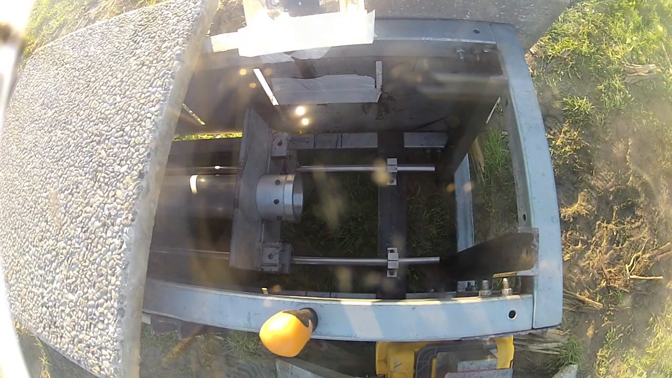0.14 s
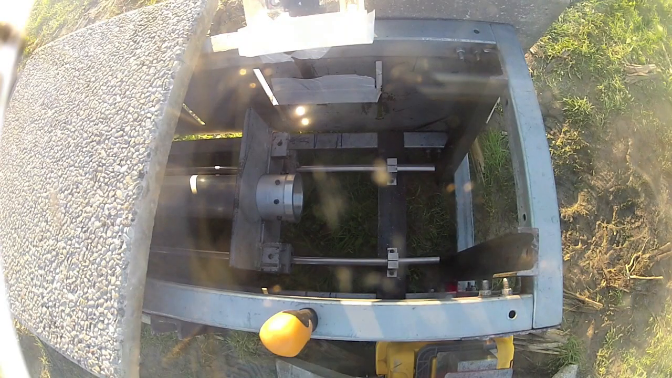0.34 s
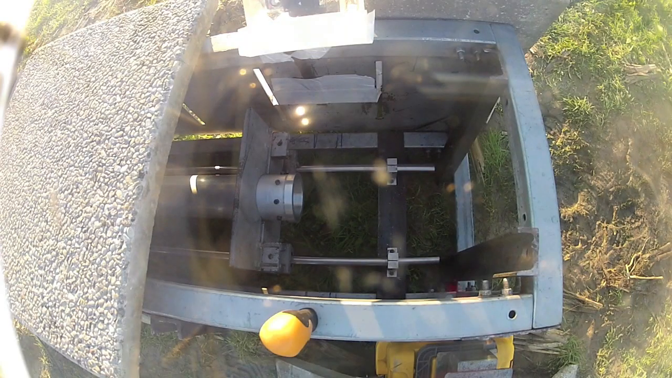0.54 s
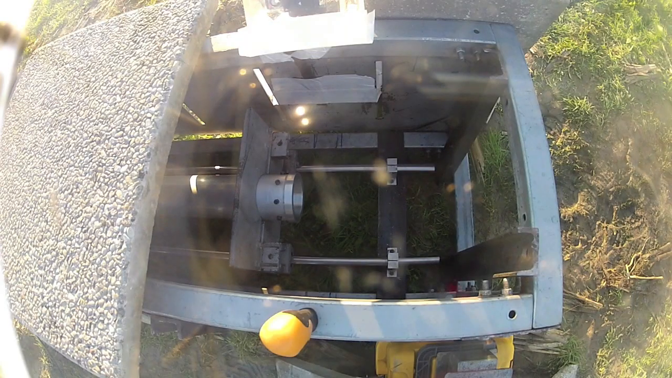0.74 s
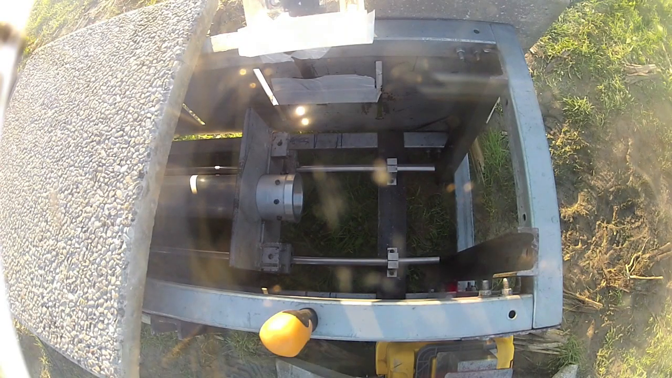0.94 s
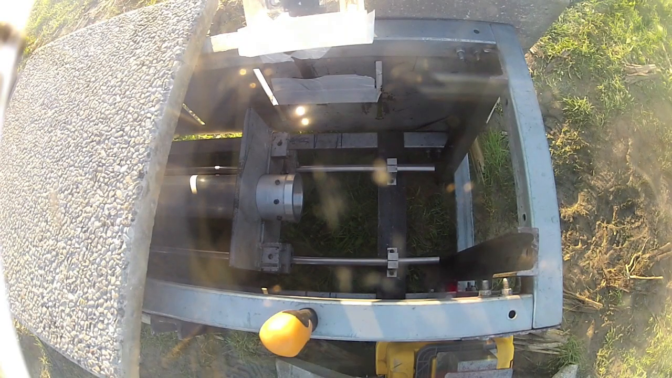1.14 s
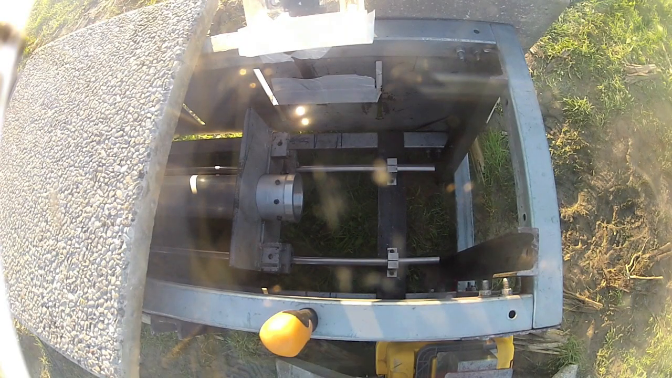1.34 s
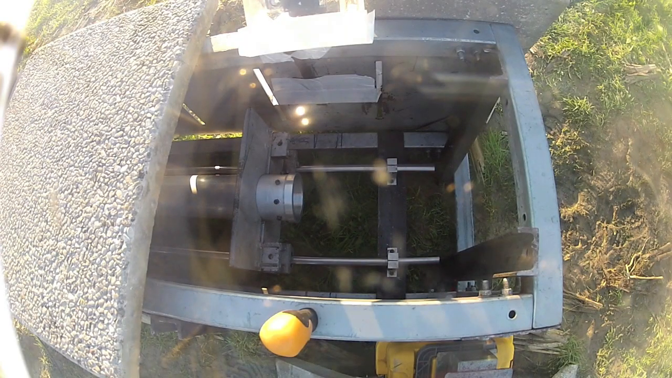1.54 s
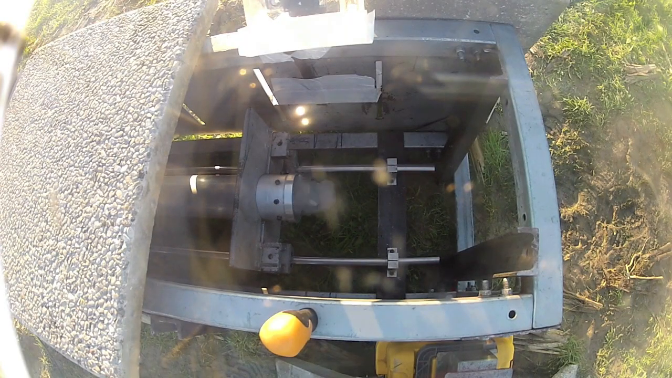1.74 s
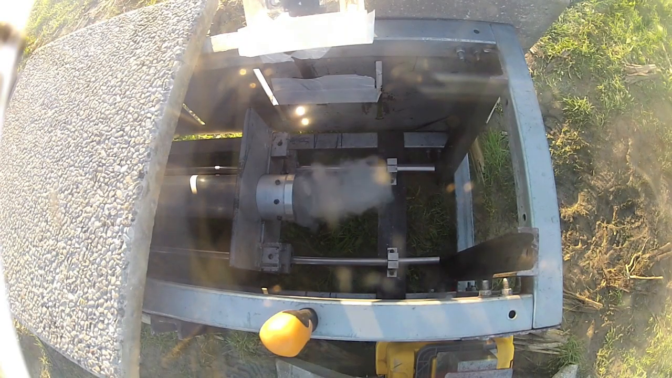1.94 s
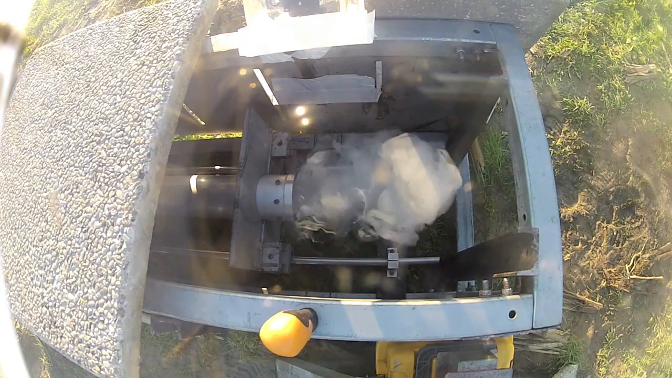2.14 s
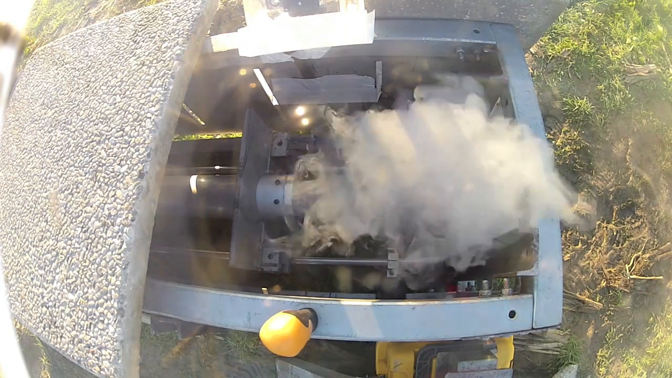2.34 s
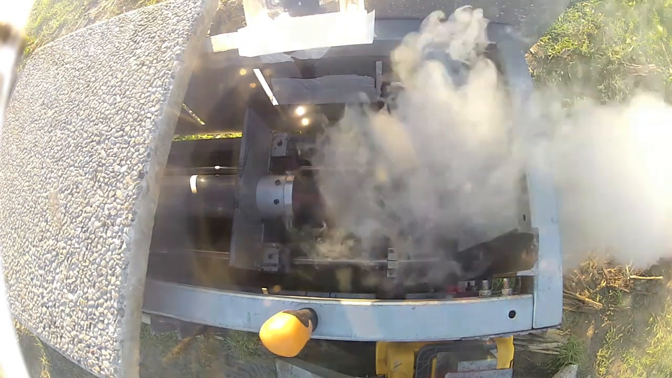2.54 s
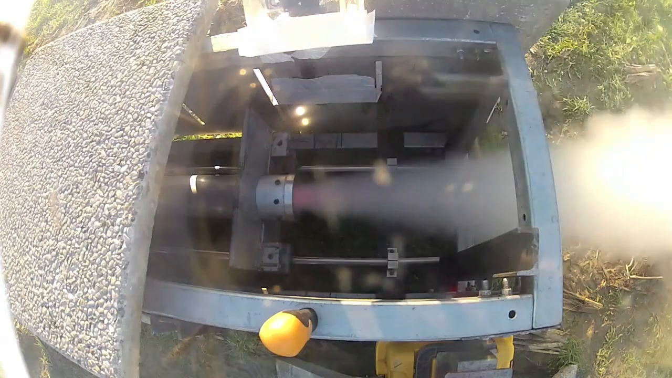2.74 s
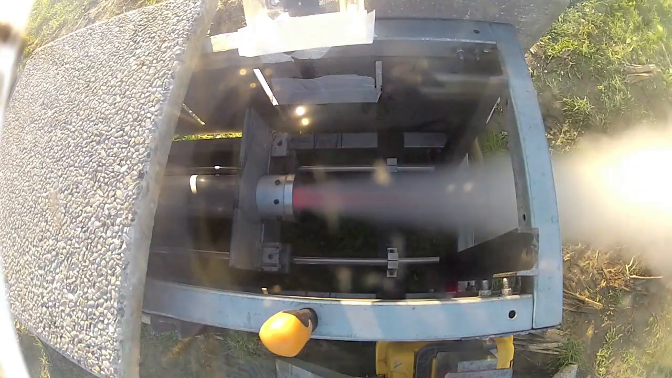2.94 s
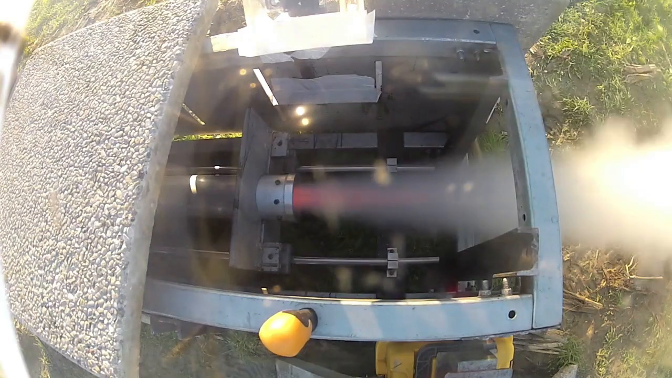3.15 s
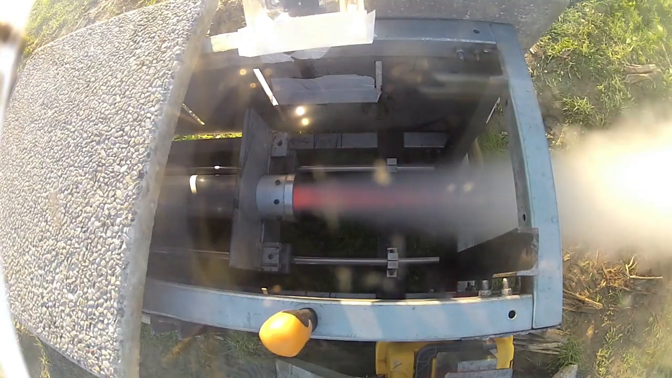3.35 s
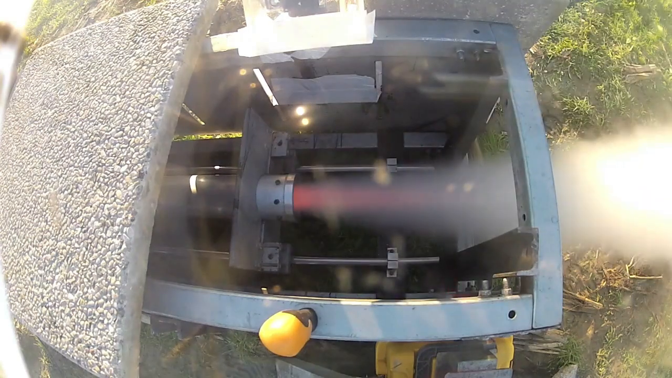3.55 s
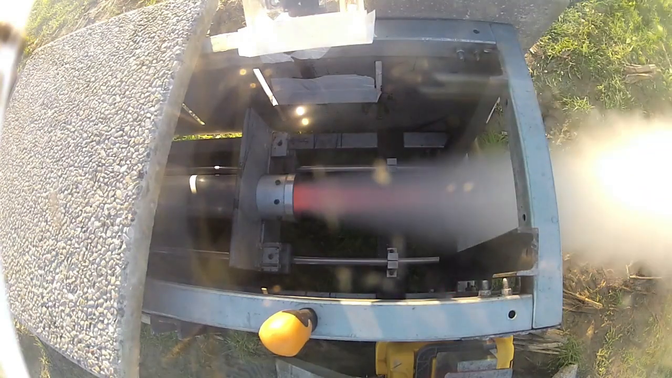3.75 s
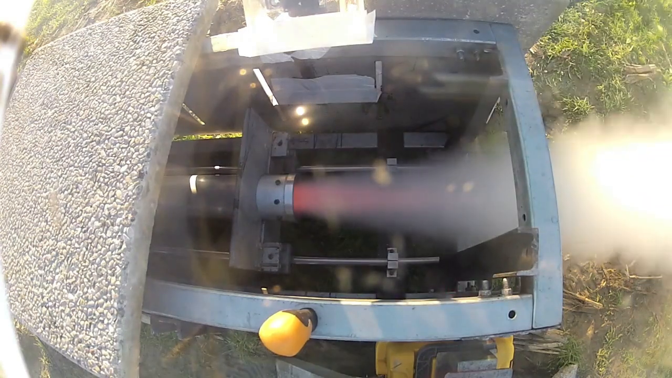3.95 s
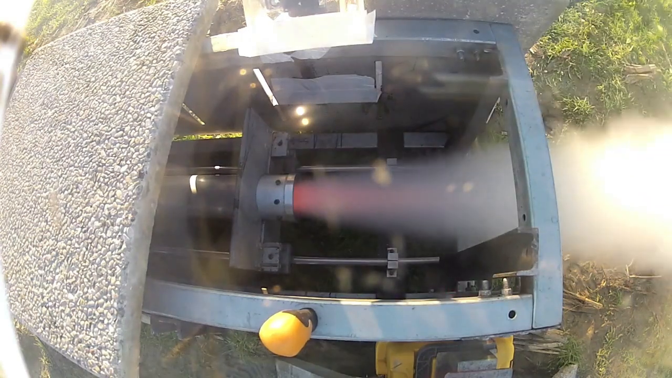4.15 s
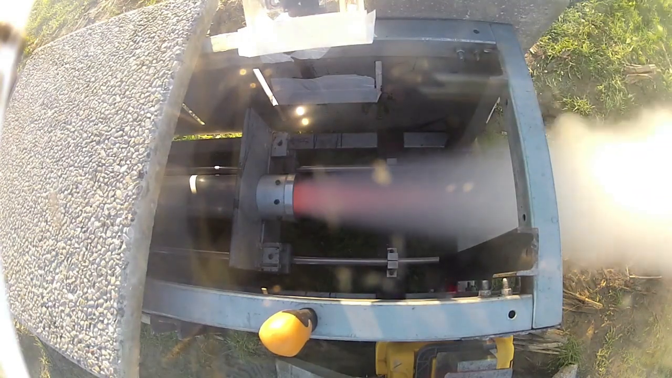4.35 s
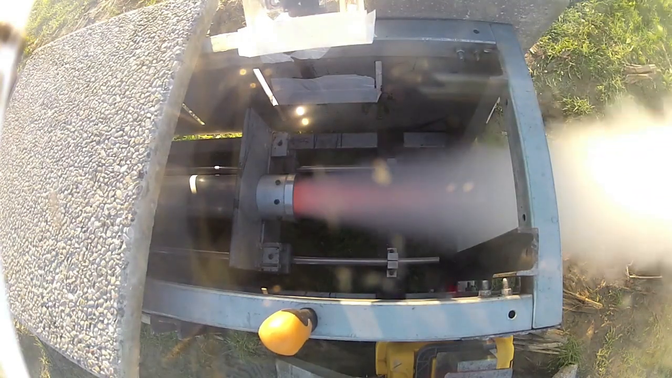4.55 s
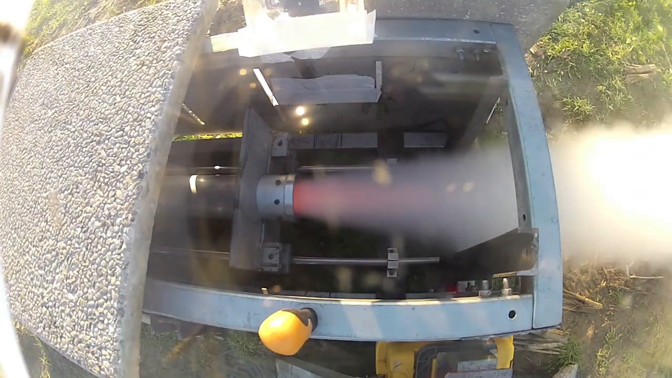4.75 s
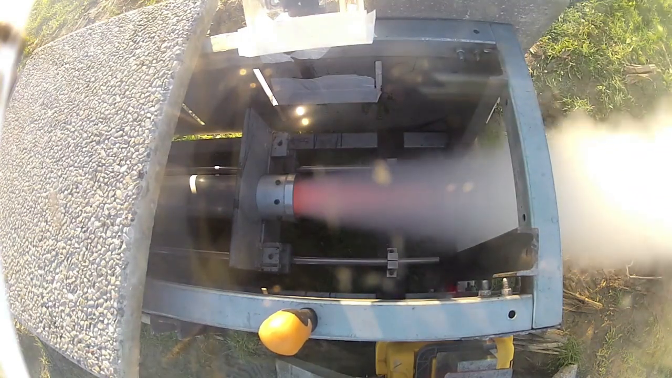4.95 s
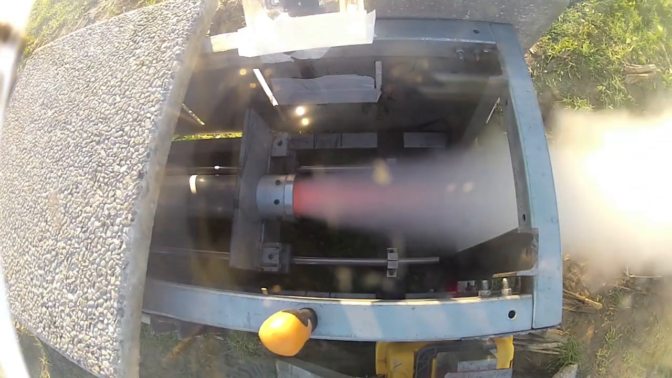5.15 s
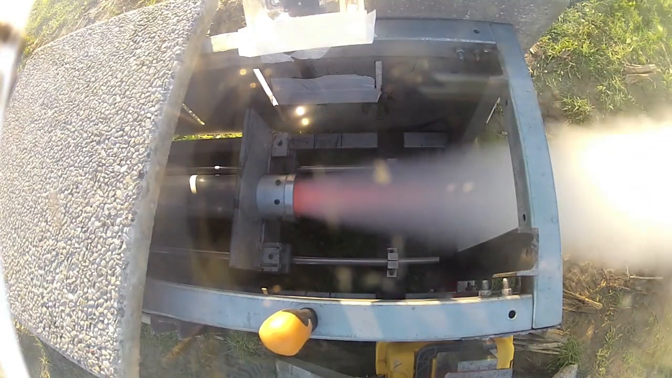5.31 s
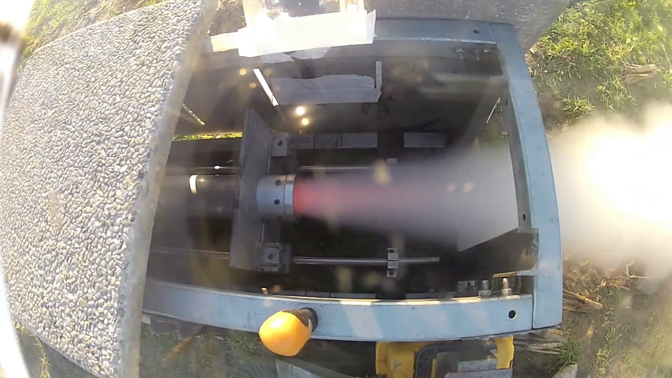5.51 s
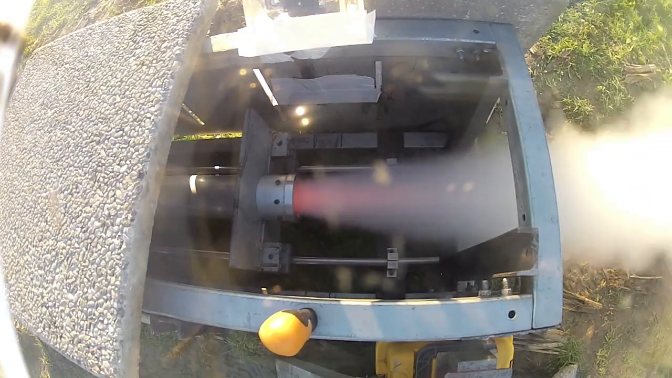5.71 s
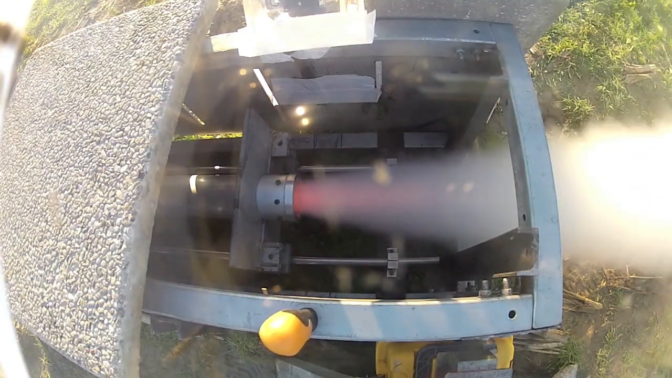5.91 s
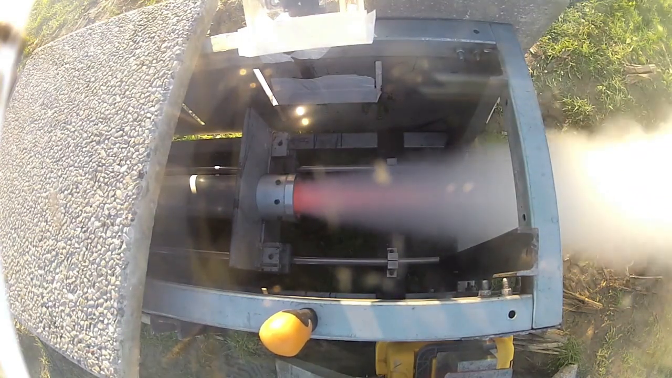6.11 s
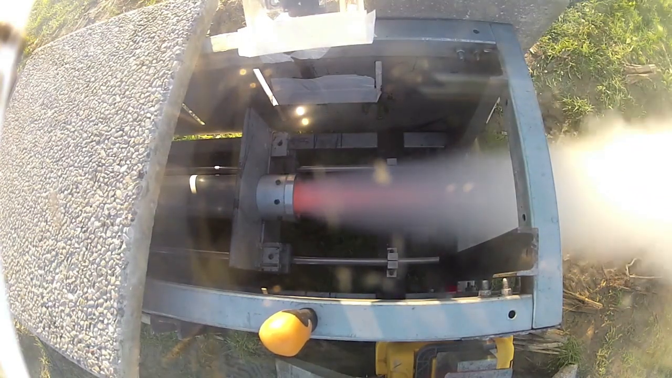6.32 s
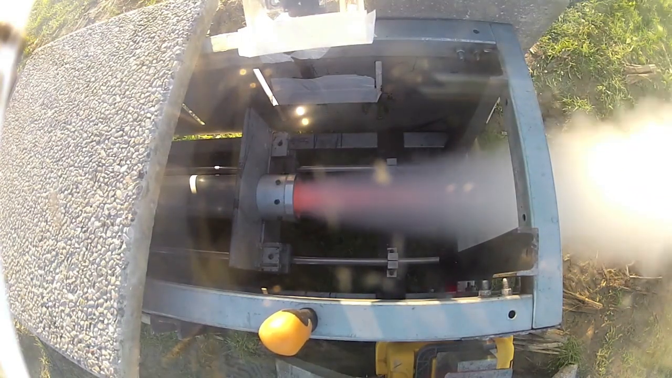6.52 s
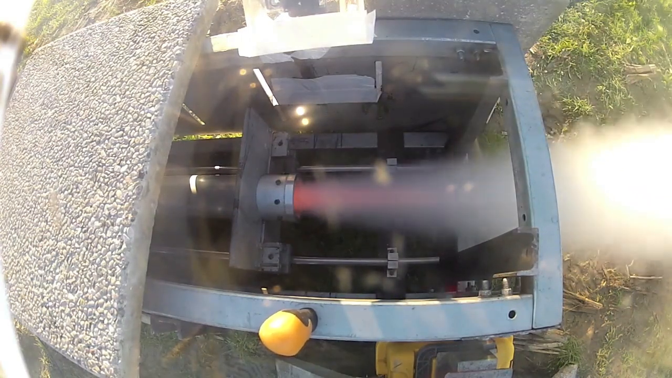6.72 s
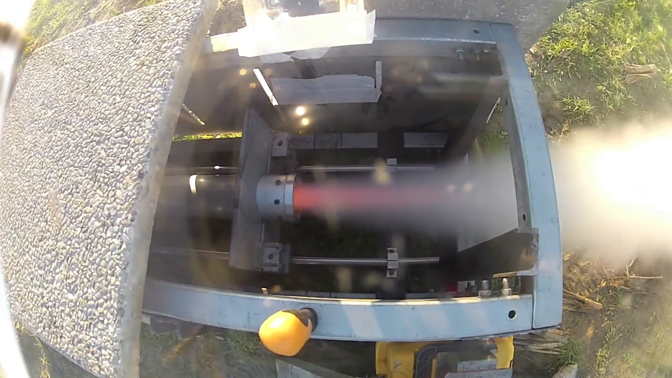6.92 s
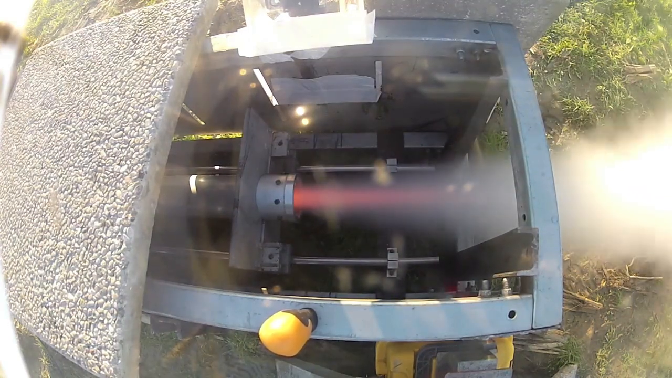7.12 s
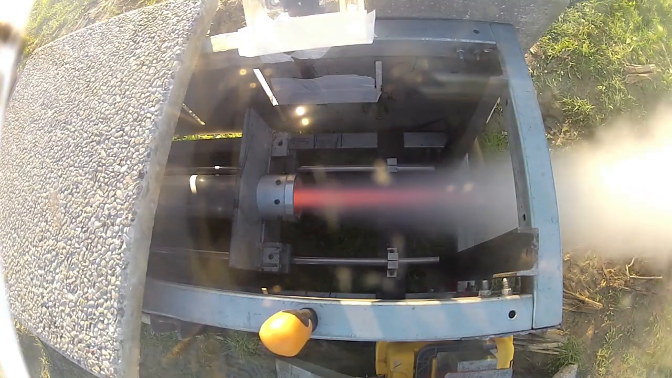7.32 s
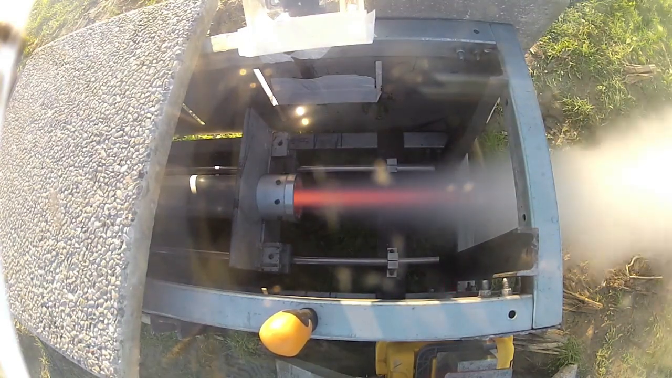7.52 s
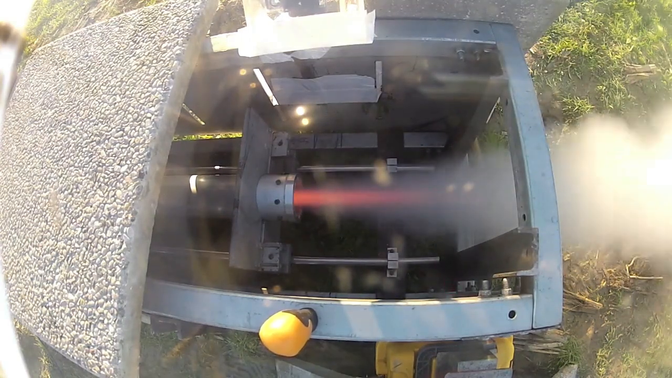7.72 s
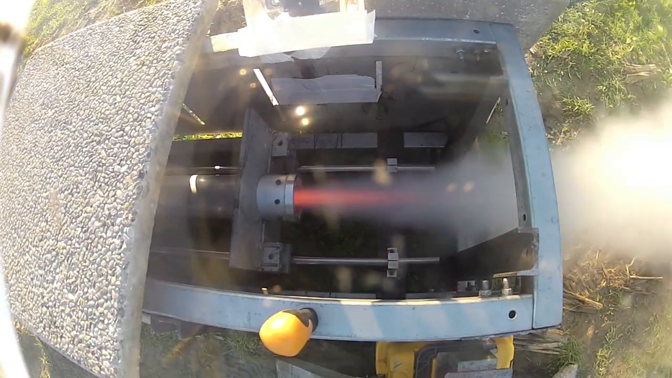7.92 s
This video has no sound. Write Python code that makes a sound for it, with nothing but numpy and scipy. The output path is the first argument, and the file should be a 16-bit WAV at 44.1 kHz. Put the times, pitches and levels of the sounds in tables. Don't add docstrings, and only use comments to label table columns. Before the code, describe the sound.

Faint distant machinery drone, one echoing metallic thump, then a sudden loud boxy rocket jet roar with soft knocks, weakening at the end.

```python
import sys
import numpy as np
from scipy import signal
from scipy.fft import rfft, irfft, next_fast_len
from scipy.io import wavfile
from scipy.ndimage import uniform_filter1d, map_coordinates

SR = 44100
rng = np.random.default_rng(int(sys.argv[2]) if len(sys.argv) > 2 else 0)


def invert_db(level):
    return 10 ** (np.asarray(level, dtype=float) / 20)


def transcribe(u):
    v = np.clip(np.atleast_2d(u).T, -1, 1)
    q = np.round(v * 32767).astype(np.int16)
    wavfile.write(sys.argv[1], SR, q)


N = 355887
TIME = np.arange(N) / SR
BLOW_TIME = np.arange(SR // 2) / SR


def unit(x):
    return x / np.sqrt(np.mean(x ** 2) + 1e-20)


def along(points, hz):
    f, v = np.transpose(points)
    return np.interp(np.log(hz + 1), np.log(f + 1), v)


def bumps(points, f):
    return sum(db / (1 + (2 * (f - hz) / width) ** 2) for hz, width, db in points)


def band(f, lo_hz, hi_hz):
    return 1 / np.sqrt((1 + (lo_hz / (f + 1)) ** 20) * (1 + (f / hi_hz) ** 20))


def curves(rows):
    s, *cols = np.transpose(rows)
    return [np.interp(TIME, s, c, left=-120, right=-120) for c in cols]


def wobble(rate):
    knots = rng.standard_normal(int(N * rate / SR) + 4)
    return map_coordinates(knots, [np.arange(N) * rate / SR])


def filtered(x, response):
    m = next_fast_len(N + SR // 2)
    return irfft(rfft(x, m) * response(np.fft.rfftfreq(m, 1 / SR)), m)[:N]


def rush(response, patchy_db):
    z = signal.stft(rng.standard_normal(N), nperseg=512)[2]
    patches = uniform_filter1d(rng.standard_normal(z.shape), size=5, axis=0)
    patches = uniform_filter1d(patches, size=8, axis=1)
    noise = signal.istft(z * invert_db(patchy_db * unit(patches)), nperseg=512)[1][:N]
    return unit(filtered(noise, response))


def ring(modes, scatter_db):
    out = 0
    for hz, db, t60 in modes:
        decay_db = db + scatter_db * rng.standard_normal() - 60 * BLOW_TIME / t60
        out = out - invert_db(decay_db) * np.sin(2 * np.pi * hz * BLOW_TIME)
    return out


# f/Hz, level/dB [per Hz]
AIR = [(15, -24), (55, -6), (180, -1.5), (280, -7), (450, -11), (600, -17.5), (1200, -21), (3000, -27.5),
       (5000, -29), (5500, -34), (6000, -44)]
# f/Hz, width/Hz, level/dB [over the air]
HUMS = [(230.4, 10, 3), (336, 11, 10), (1510, 35, 8.5), (2240, 45, 6)]
# multiple of its rate [1], level/dB
ENGINE = [(1, -72), (1.55, -71.5), (2.02, -67), (2.97, -69.5), (3.95, -78.5)]


def field():
    engine_hz, air_db = 115.5, -57.5
    turns = np.cumsum(engine_hz * (1 + 0.0125 * wobble(3))) / SR
    drone = sum(invert_db(db + 2.5 + 1.5 * wobble(6)) * np.sin(2 * np.pi * k * turns) for k, db in ENGINE)
    air = rush(lambda f: invert_db(along(AIR, f) + bumps(HUMS, f)), patchy_db=1.0)
    return drone + invert_db(air_db - 1.15 + 0.98 * wobble(3.1)) * air


# t/s, peak level/dB
IGNITER = [
    (1.0843, -11),
]
# f/Hz, level/dB, t60/s
BLAST = [(268, 9.5, .016), (181, 0.5, 0.021)]
# delay t/s, level/dB
ECHOES = [
    (0, 0),
    (.0068, -9),
    (.0145, -18),
    (.0185, -19),
]
# f/Hz, level/dB, t60/s
STAND = [(64, -23, .35), (160, -16, .03), (280, -18, .07), (452, -30, .08), (940, -33, .19),
         (1180, -30, .06), (1480, -30, .06), (2130, -27, .07), (2270, -24, .085), (3250, -38, .05)]
# low f/Hz, high f/Hz, level/dB [re the blow], t60/s
YARD = [(50, 70, -35, 1.0), (100, 600, -26, 0.17), (500, 2300, -22, 0.077), (2300, 4900, -42, .035)]


def igniter():
    out = np.zeros(N + SR)
    (s, db), = IGNITER
    swell = 1 - np.exp(-(BLOW_TIME / .0019) ** 2)
    for later, echo_db in ECHOES:
        pulse = invert_db(db + echo_db) * ring(BLAST, scatter_db=.6) * swell
        out[round((s + later) * SR):][:len(pulse)] += pulse
    clang = invert_db(db) * ring(STAND, scatter_db=0.0) * swell ** 2
    out[round(s * SR):][:len(clang)] += clang
    since = np.maximum(TIME - s, 0)
    for lo, hi, under_db, t60 in YARD:
        scatter = rush(lambda f: band(f, lo, hi), patchy_db=1.5)
        onset = 1 - np.exp(-since / 0.00086)
        out[:N] += invert_db(db + under_db - 60 * since / t60) * onset * scatter
    return out[:N]


# t/s, peak level/dB
CHUFFS = [(2.62, -32), (2.648, -47), (2.803, -16), (2.872, -16), (3.221, -24), (3.67, -15.5), (3.744, -8),
          (4.369, -18), (5.069, -19), (5.183, -31), (5.453, -10), (5.83, -21), (8.028, -16)]
# f/Hz, level/dB, t60/s
SLAG = [(157, -9, 0.042), (282, 0, 0.045), (440, -5.5, 0.041), (641, -7, 0.03)]


def chuffs():
    out = np.zeros(N + SR)
    soft_onset = 1 - np.exp(-BLOW_TIME / 0.0079)
    for s, db in CHUFFS:
        knock = invert_db(db + 3.5) * ring(SLAG, scatter_db=-2.5) * soft_onset
        out[round(s * SR):][:len(knock)] += knock
    return out[:N]


# f/Hz, width/Hz, level/dB
BORE = [(641, 60, 0), (969, 55, -7), (1620, 80, -18)]


def chamber():
    leak_s, leak_db = 1.7, -81
    full_s, full_db = 2.654, -38
    climb_db_per_s, choke_db_per_s = 58, 260

    def columns(f):
        return sum(invert_db(db) * (f * w / (hz * hz - f * f + 1j * f * w)) ** 2 for hz, w, db in BORE)

    climb_db = np.maximum(full_db - climb_db_per_s * (full_s - TIME), leak_db + 4.5 * wobble(12))
    choke_db = full_db - choke_db_per_s * (TIME - full_s)
    fill_db = np.where(TIME < full_s, climb_db, choke_db)
    return (TIME > leak_s) * invert_db(fill_db - 1) * rush(columns, patchy_db=.8)


# t/s, level/dB, length/s
THUD = (2.6, -46, .07)


def thud():
    s, db, length = THUD
    push = np.exp(-((TIME - s - length / 2) / length * 2) ** 2)
    return invert_db(db) * push * rush(lambda f: band(f, 25, 140), patchy_db=-1)


# t/s, level/dB [re full burn]
PRESSURE = [(2.0, -75), (2.15, -74), (2.3, -62), (2.4, -50), (2.45, -39), (2.5, -25), (2.53, -20.5),
            (2.56, -3), (2.61, 0.15), (7.6, -.1), (7.7, -2.7), (7.77, -2.5), (7.83, -4), (7.86, -7.5),
            (7.91, -9.5), (8.12, -10.3)]


def follows(part, lag_s, drift_db):
    full_db, climbing, tailing, catch_db, wide_db = part
    catch_s, catch_rise_s, catch_fade_s = 2.615, 0.035, 0.1
    widest_s, wide_for_s = 5.13, 1.5
    pressure_db, = curves(PRESSURE)
    late_db = np.interp(TIME - lag_s, TIME, pressure_db)
    since_catch = TIME - catch_s
    catch = np.clip(1 + since_catch / catch_rise_s, 0, 1)
    catch = catch * np.exp(-np.maximum(since_catch, 0) / catch_fade_s)
    wide = np.exp(-((TIME - widest_s) / wide_for_s) ** 2)
    law_db = np.where(TIME < widest_s, climbing * late_db, tailing * pressure_db)
    level_db = full_db + law_db + catch_db * catch + wide_db * wide + drift_db * wobble(3)
    return np.where(pressure_db < -100, -120, level_db)


# f/Hz, level/dB [per Hz]
JET = [(20, -45.0), (40, -42.0), (65, -26.0), (95, -32.0), (200, -25.0), (750, -30.0), (1050, -23.0),
       (1250, -12.0), (2000, -13.0), (2650, -20.0), (4000, -18.0), (4300, -22.0), (6000, -31.0)]
# f/Hz, width/Hz, level/dB [over the slope]
HOUSING = [(290, 81, 13.0), (375, 26, -8.0), (435, 94, 15.0), (632, 60, 5.0), (968, 58, 5.0),
           (1020, 47, -6.0), (1568, 214, 3.0), (1954, 53, 5.0), (2226, 305, 15.0), (2359, 38, 4.0),
           (2759, 85, -6.0), (2886, 152, 10.0), (3204, 74, 4.0), (3295, 66, -8.0), (3541, 81, 3.0),
           (3679, 33, 4.0), (3957, 199, 8.0), (4308, 327, -11.0), (4461, 134, 12.0), (4656, 54, -3.0),
           (4921, 146, 9.0), (5066, 76, -1.0), (5212, 143, 8.0), (5385, 121, 9.0), (5548, 46, 11.0),
           (5798, 201, 8.0)]
# t/s, level/dB [over the jet], length/s
SURGES = [
    (2.617, 2, .004),
    (2.628, 3, .003),
    (2.647, 4.5, .004),
    (2.665, 2, .003),
    (2.76, 1, .004),
]
# full level/dB, climbing [dB per dB], tailing off [dB per dB],
# catch overshoot level/dB, widest plume level/dB
RUMBLE = (-35.5, 1.1, -0.06, -3, 1.5)
ROAR = (-25, 0.76, 0.36, 5, 1.5)
WHINE = (-18.5, 1, 1.05, 0, 0.45)
HISS = (-26.5, 1.15, 1.4, 3.5, -2)
FIZZ = (-28, 0.9, 1.5, 6, -2.1)


def jet():
    eddies = .45 * wobble(14) + .6 * wobble(40) + .4 * wobble(90)

    def part(lo_hz, hi_hz, patchy_db):
        colour = lambda f: invert_db(along(JET, f) + bumps(HOUSING, f)) * band(f, lo_hz, hi_hz)
        return rush(colour, patchy_db)

    rumble_db = follows(RUMBLE, 0, drift_db=-0.2) + 2 + 1.3 * eddies + 0.45 * wobble(30)
    roar_db = follows(ROAR, 0, drift_db=-0.74) + 1.22 + 1.11 * eddies
    whine_db = follows(WHINE, 0, drift_db=0.33) - 0.2 + 0.17 * eddies
    hiss_db = follows(HISS, 0.043, drift_db=0.28) + 3.0 + 0.39 * eddies
    fizz_db = follows(FIZZ, 0.04, drift_db=1.2) + 0.99 * eddies
    rumble = invert_db(rumble_db) * part(1, 800, patchy_db=-0.77)
    roar = invert_db(roar_db) * part(800, 1800, patchy_db=0.03)
    whine = invert_db(whine_db) * part(1800, 2600, patchy_db=0.45)
    hiss = invert_db(hiss_db) * part(2600, 4200, patchy_db=0.6)
    fizz = invert_db(fizz_db) * part(4200, 9000, patchy_db=-1.0)
    surge_db = sum(db * np.exp(-((TIME - s) / length) ** 2) for s, db, length in SURGES)
    return invert_db(surge_db) * (rumble + roar + whine + hiss + fizz)


def scene():
    return (field() + igniter() + chuffs() + chamber() + thud() + jet())[None]


# t/s, peak level/dB
CRACKS = [(2.7106, -34), (2.9276, -41), (3.0443, -38), (3.0947, -36), (3.2948, -37), (3.4279, -33),
          (3.7432, -38), (4.0121, -36), (4.0954, -38), (4.5958, -30), (4.8796, -28), (5.3466, -31),
          (5.38, -33), (5.4633, -32), (5.5471, -36), (5.7138, -35), (6.4645, -34), (6.5144, -33),
          (6.6816, -37), (6.9315, -39), (7.132, -31), (7.1819, -36), (7.2652, -35), (7.3485, -38),
          (7.4323, -31), (7.5157, -30), (7.6324, -35), (7.7661, -36)]


def cracks():
    ticks = np.zeros(N)
    for s, db in CRACKS:
        ticks[round(s * SR)] = invert_db(db + 23.0) * rng.choice([-1, 1])
    return filtered(ticks, lambda f: band(f, 10300, 13800))


def masked(x, under_db):
    f, _, z = signal.stft(x, SR, nperseg=2048)
    power = (np.abs(z[:-1]) ** 2).reshape(64, 16, -1).mean(axis=1)
    level = 10 * np.log10(power + 1e-30)
    fickle = uniform_filter1d(rng.standard_normal(level.shape), size=2, axis=1)
    weak = level + 7 * fickle < level.max(axis=0) + under_db
    weak = np.repeat(weak, 16, axis=0)
    z[:-1][weak & (f[:-1, None] > 10800)] = 0
    return signal.istft(z, SR, nperseg=2048)[1][:N]


# t/s, step level/dB
DUCKS = [
    (3.393, -2.6),
    (3.484, -4.9),
    (3.614, -3.5),
    (4.242, -3.5),
    (4.495, -2.4),
    (4.811, -3.0),
    (5.766, -3.7),
    (6.571, -2.6),
    (7.136, -4.1),
]


def gain_control(x):
    gain_db = 0
    for s, db in DUCKS:
        since = np.maximum(TIME - s, 0)
        gain_db = gain_db - .6 * db * np.exp(-((TIME - s + .005) / .005) ** 2)
        gain_db = gain_db + 1.1 * db * (1 - np.exp(-since / .003)) * np.exp(-since / .075)
    return x * invert_db(gain_db)


def sample_and_hold(x):
    hold_down, steps, back_down = 147, 4, 160
    fast = signal.resample_poly(x, back_down, hold_down)
    held = np.repeat(fast[::steps], steps)
    return signal.resample_poly(held, hold_down, back_down)[:N]


def grit(x):
    loudness = np.sqrt(np.abs(uniform_filter1d(x ** 2, size=2048)))
    bursts = np.clip(wobble(40) - 1.1, 0, .5)
    return invert_db(-36) * bursts * loudness * np.minimum(loudness / .1, 1) * rng.standard_normal(N)


def top_cut(x):
    return signal.sosfilt(signal.butter(12, 15800, fs=SR, output="sos"), x)


def record(dry):
    held = sample_and_hold(gain_control(dry[0]))
    rough = masked(held, under_db=-43) + grit(held)
    limit = [(15200, 0), (15330, -14), (15450, -50), (15800, -80)]  # f/Hz, level/dB
    limited = filtered(rough, lambda f: invert_db(along(limit, f)))
    return top_cut((limited + cracks())[None])


dry = scene()
out = record(dry)
transcribe(out)
```